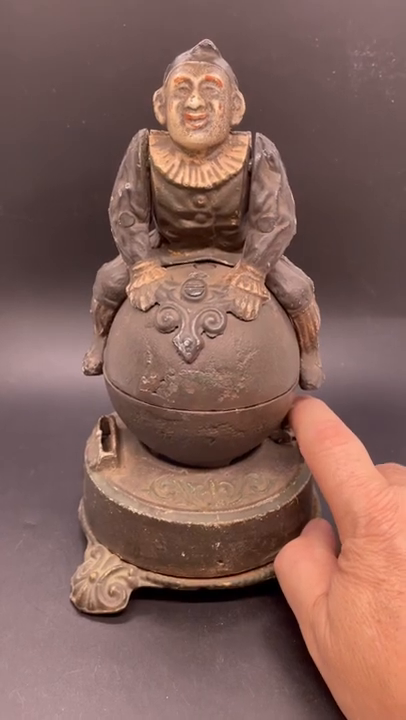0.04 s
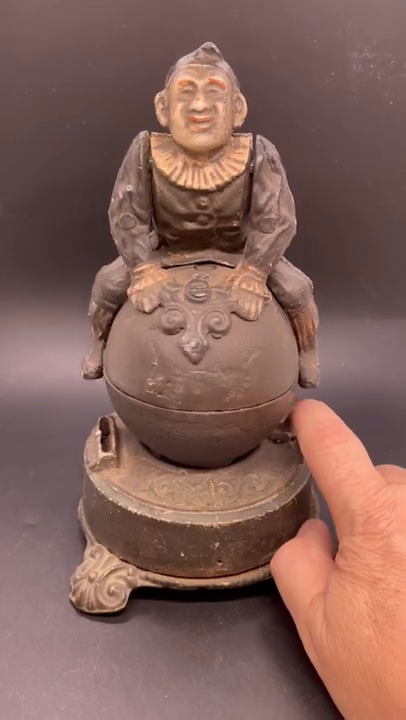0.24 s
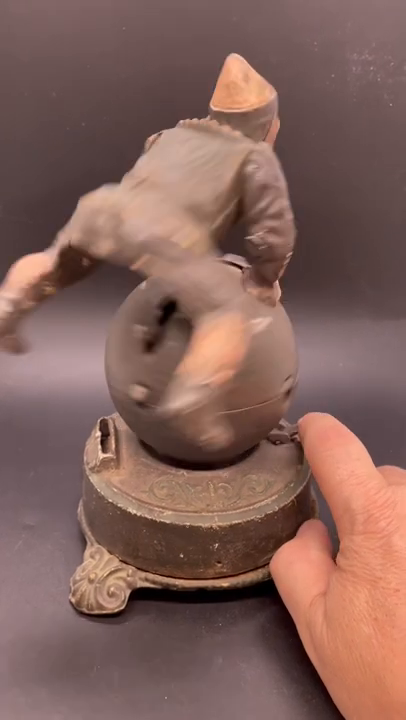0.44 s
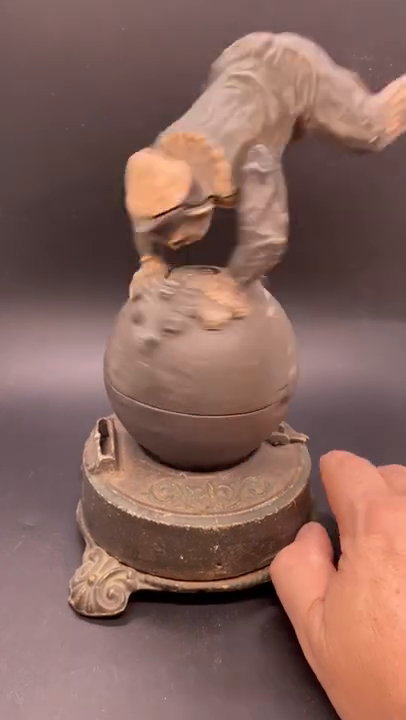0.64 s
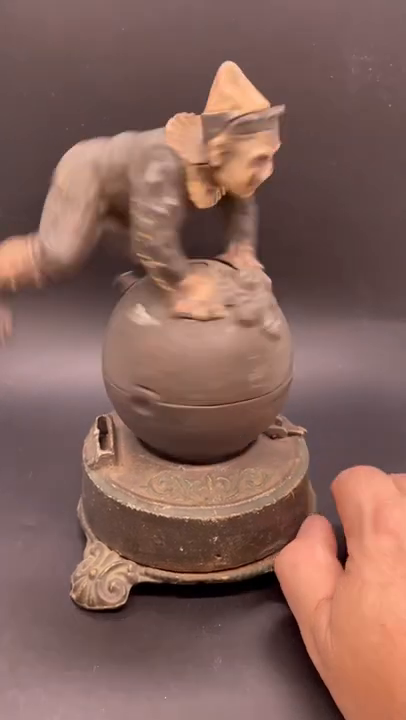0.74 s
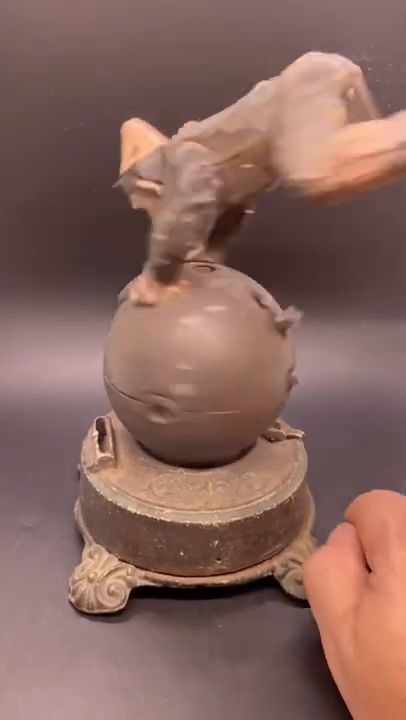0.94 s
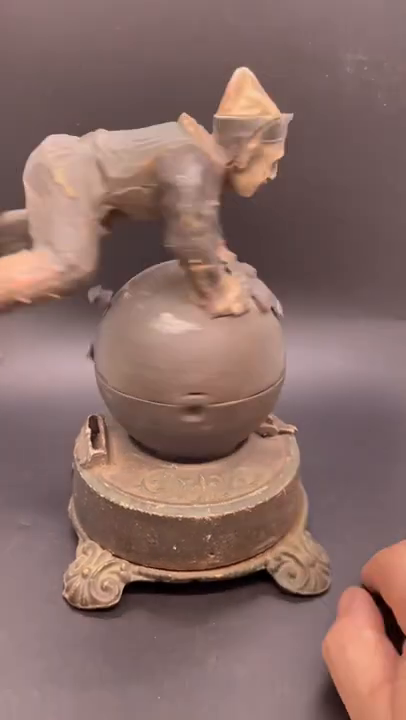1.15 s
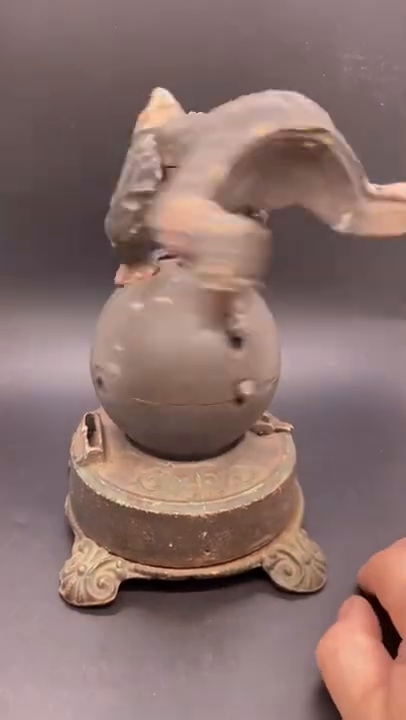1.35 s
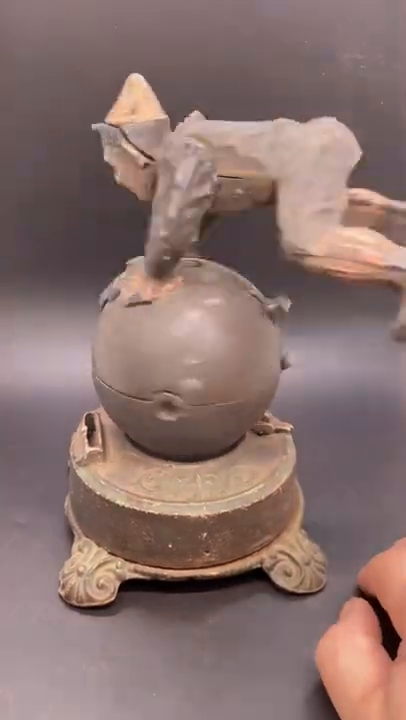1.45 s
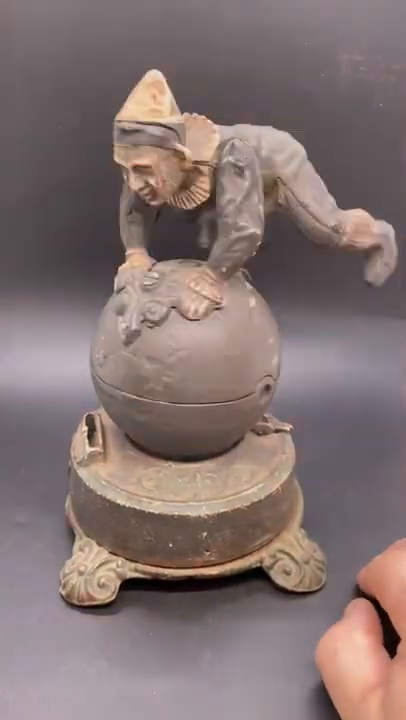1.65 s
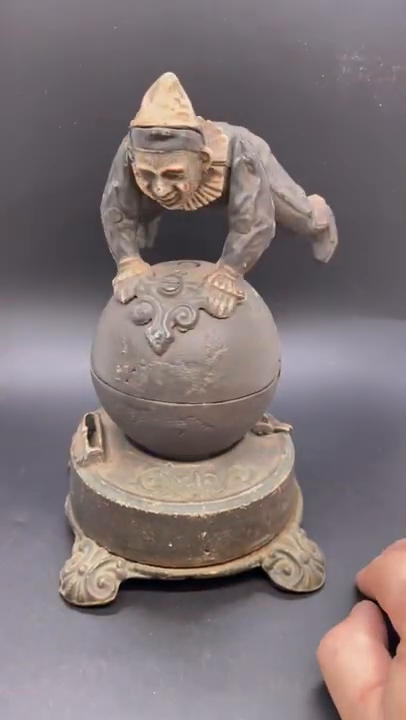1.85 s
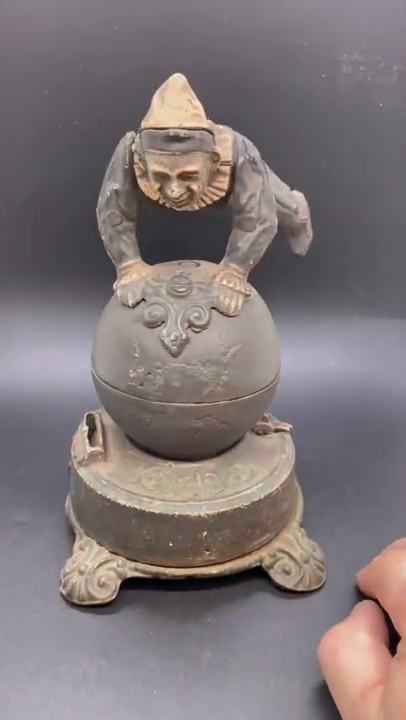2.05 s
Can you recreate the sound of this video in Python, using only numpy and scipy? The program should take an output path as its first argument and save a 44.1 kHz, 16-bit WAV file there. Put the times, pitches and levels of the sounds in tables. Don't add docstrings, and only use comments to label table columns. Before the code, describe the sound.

A cast-iron mechanical bank, heard close in a small, fairly dry room with a low wavering hum. Faint lever ticks before 0.2 s, then knocks and rough grinding burst out, with a bright hard clack at 0.4 s. Uneven metallic rattling, table thumps and thin squeals continue from 0.55 to 1.2 s, thinning to separate knocks by 1.5 s, soft rocking until 1.8 s, and a faint last tick near 2.1 s.

```python
import sys
import numpy as np
from scipy import signal
from scipy.fft import rfft, irfft, next_fast_len
from scipy.io import wavfile
from scipy.ndimage import uniform_filter1d, map_coordinates

SR = 44100
rng = np.random.default_rng(int(sys.argv[2]) if len(sys.argv) > 2 else 0)


def wrap_up_sound(samples):
    columns = np.atleast_2d(samples).T
    tamed = np.clip(columns, -1, 1)
    steps = np.round(tamed * 32767).astype(np.int16)
    wavfile.write(sys.argv[1], SR, steps)


def voltage_ratio(decibels):
    exponent = np.asarray(decibels, float) / 20
    return 10 ** exponent


N = 92610

# start_s, peak_db, table thump over it_db, brightness over it_db, ring_hz
KNOCKS = [(0.176, -24, -23, -19, 900), (0.229, -22, -7.5, -52, 840), (0.261, -15.5, -26, -61, 810),
          (0.314, -6.5, -29, -48, 683), (0.364, -14, -6, -42, 694), (0.489, -32, 1, -10, 690),
          (0.62, -12.5, -43, -21, 2453), (0.664, -18.5, -39, -30, 797), (0.699, -10.5, -18, -38, 896),
          (0.725, -27, -4, -28, 770), (0.869, -13, -11, -24, 752), (0.883, -14, -22, -17, 870),
          (0.93, -14.5, -17.5, -21, 747), (1.026, -10, -21, -25, 757), (1.049, -18, -9, -18, 706),
          (1.098, -15, -4, -23, 1058), (1.253, -16.5, -21, -28.5, 727), (1.311, -7, -16, -32, 818),
          (1.369, -23.5, -9, -40, 1095), (1.422, -25, -9, -42, 1097), (1.471, -18.5, -13, -53, 700),
          (1.582, -23, -4.5, -37, 730), (1.681, -33.5, 1.5, -17, 740), (1.702, -41, 9, -18, 680)]
KNOCK_S, KNOCK_DB, THUMP_DB, BRIGHT_DB, KNOCK_HZ = np.transpose(KNOCKS)
SHEEN_DB = -19


def mechanism():
    # time_s, grinding_db, table load over it_db
    spin = [(0.16, -58, 23), (0.176, -24.5, -17), (0.218, -46.5, 19), (0.277, -24, 9.5), (0.368, -20, -1),
            (0.389, -26, 14), (0.408, -40.5, -1), (0.44, -37, 5), (0.733, -26, 4), (0.763, -33, 9),
            (0.945, -24.5, 5), (1.217, -36.5, 9.5), (1.324, -30.5, -2.5), (1.398, -46, 14),
            (1.482, -43, 16.5), (1.505, -46.5, 16.5), (1.718, -52.5, -7), (1.85, -70.5, 13)]
    # start_s, peak_db
    ticks = [
        (0.092, -59.5),
        (0.163, -51),
        (2.097, -40),
    ]
    time_s, grind_db, load_db = np.transpose(spin)
    t = np.arange(N) / SR
    grind_db = np.interp(t, time_s, grind_db, -120, -120)
    load_db = np.interp(t, time_s, load_db)
    clumps = voltage_ratio(grind_db + 2.84 * wobble(70) - 6.0) * rattle()
    knocks = bursts(KNOCK_S, KNOCK_DB - 7.5, rise_s=0.0014, t60_s=0.03)
    shell = clumps + knocks + bursts(*np.transpose(ticks), rise_s=0.001, t60_s=0.036)
    sheen, snaps = bright_edge(clumps, shell)
    fine = voltage_ratio(-4.5) * chatter(uniform_filter1d(shell, size=700))
    return iron_shell(shell) + sheen + fine + struck_parts() + table(grind_db + load_db) + rocking(), snaps


def grit():
    contacts_per_s, spread_db = 5000, 3.5
    hit = rng.random(N) < contacts_per_s / SR
    size = voltage_ratio(spread_db * rng.exponential(size=N)).clip(0, 8)
    return unit(hit * rng.standard_normal(N) * size)


def rattle():
    taps_per_s, level_db, t60_s = 480, -7, 0.021
    taps = (rng.random(N) < taps_per_s / SR) * rng.uniform(0.19, 1, N)
    decay = voltage_ratio(-60 * np.arange(SR // 10) / SR / t60_s)
    return 1 + voltage_ratio(level_db) * signal.fftconvolve(taps, decay)[:N]


def iron_shell(envelope):
    # centre_hz, width_hz, level_db
    iron = [(593.7, 48, -7), (710, 50, 3.5), (830, 130, -0.5), (1099, 16, -4.5), (1255, 250, -9),
            (1677, 84, -19), (1637, 29, -7), (2118, 90, -5), (2536, 76, -6.5), (3212, 130, -15),
            (4000, 310, -17.5), (5300, 200, -16), (5210, 470, -16), (7700, 450, -23.5)]
    force = grit()
    total = np.zeros(N)
    for k, mode in enumerate(iron):
        mixed = force + np.roll(force, k * SR // 10)
        coupling = voltage_ratio(2 * wobble(24.3) - 3)
        total += (-1) ** k * body(mixed * envelope * coupling, [mode])
    return total / np.std(body(force, iron))


def bright_edge(clumps, shell):
    # freq_hz, level_db
    spectrum = [(3000, -65.5), (6000, 4.5), (8400, 3.5), (10200, -6), (12500, -12), (15500, -9.5),
                (16500, -17)]
    # centre_hz, width_hz, level_db
    edge_modes = [(7160, 120, 10), (8020, 100, 4.5), (9300, 110, -4), (10500, 120, -3.5), (13400, 200, -5),
                  (14000, 200, -12.5)]
    # start_s, peak_db
    spikes = [(.094, -62), (0.159, -55), (0.317, -18), (.358, -44), (0.491, -41), (0.748, -30.5),
              (1.255, -38), (1.3126, -23.5), (1.371, -39), (1.423, -45.5), (1.472, -40)]
    bright = unit(filtered(grit(), lambda hz: voltage_ratio(along(spectrum, hz))))
    snaps = bright * bursts(*np.transpose(spikes), rise_s=0.00017, t60_s=0.04)
    grinding = voltage_ratio(SHEEN_DB) * uniform_filter1d(clumps, size=900)
    knocks = bursts(KNOCK_S, KNOCK_DB + BRIGHT_DB - 2.5, rise_s=0.00028, t60_s=0.12)
    edge_force = voltage_ratio(SHEEN_DB) * uniform_filter1d(shell, size=900)
    ringing = voltage_ratio(3.5) * driven(grit(), edge_force, edge_modes)
    return bright * (grinding + knocks) + ringing, snaps


def chatter(envelope):
    fine_hz = [528, 684, 870, 1116, 1251, 1354, 1638, 1835, 1982, 2300, 2545, 3255, 4978, 5430]
    taps_per_s, detune, width_hz, tilt_db_per_octave = 90, 0.012, 20, -3
    modes = []
    for hz in fine_hz:
        ratio = hz / fine_hz[0]
        for k in (-1, 1):
            modes.append((hz * (1 + detune * k), width_hz * np.sqrt(ratio), tilt_db_per_octave * np.log2(ratio)))
    shape = (len(modes), N)
    taps = (rng.random(shape) < taps_per_s / SR) * rng.standard_normal(shape)
    ringing = [body(np.array([tap, tap * envelope]), [mode]) for tap, mode in zip(taps, modes)]
    steady, shaped = np.sum(ringing, axis=0)
    return shaped / steady.std()


def struck_parts():
    # start_s, peak_db, ring_hz
    settles = [
        (1.549, -34.5, 830),
        (1.64, -38, 800),
        (1.703, -28.5, 714),
        (1.769, -42.5, 654),
        (1.795, -47, 760),
        (2.001, -50, 830),
    ]
    # start_s, peak_db, ring_hz
    pings = [(.332, -30, 4870), (0.384, -33, 5500), (.5226, -32, 1270), (.558, -37, 2530),
             (0.6193, -25, 1296), (.638, -30.5, 4000), (0.647, -28, 5470), (0.6653, -24.5, 1990),
             (0.677, -27, 5530), (.685, -22.5, 4860), (.7, -15, 1073), (0.703, -25.5, 3020),
             (0.709, -27, 2502), (0.722, -25, 5940), (0.722, -25, 3280), (.735, -26.5, 2098),
             (0.776, -29, 2610), (.8554, -31, 2620), (0.8856, -27.5, 2590), (0.9294, -28, 1110),
             (0.96, -37, 2550), (1.028, -25, 1303), (1.0464, -23, 2180), (1.058, -26, 3815),
             (1.083, -23, 2110), (1.095, -38, 5300), (1.1033, -22, 2035), (1.107, -26, 3280),
             (1.2366, -38, 1620), (1.2584, -24.5, 2540), (1.289, -25.5, 1800), (1.292, -38, 5300),
             (1.3096, -18.5, 1250), (1.313, -19, 2574), (1.323, -26, 5300), (1.424, -44, 5400),
             (1.477, -30, 1082), (1.478, -34.5, 3294), (1.584, -44.5, 2100), (1.681, -45, 3240),
             (1.701, -47.5, 2050)]
    knocks = rings(KNOCK_S, KNOCK_DB - 9, KNOCK_HZ, t60_s=0.073)
    return knocks + rings(*np.transpose(settles), t60_s=0.064) + rings(*np.transpose(pings), t60_s=0.054)


def table(load_db):
    # centre_hz, width_hz, level_db
    table_modes = [(100, 72.3, 2.5), (163, 45, -12.5), (229, 21.5, -11), (316, 91.3, -4)]
    thump_db = KNOCK_DB + THUMP_DB
    load = voltage_ratio(load_db + 3 * wobble(21) + 1.8 * wobble(9.34) - 3.5)
    load = load + bursts(KNOCK_S, thump_db, rise_s=0.0014, t60_s=0.11)
    push_hz = 110.7 * (1 + 0.096 * rng.standard_normal(len(KNOCK_S)))
    pushed = rings(KNOCK_S, thump_db + 8.5, push_hz, t60_s=0.14)
    return pushed + driven(rng.standard_normal(N), load, table_modes)


def rocking():
    # start_s, length_s, peak_db, pitch_hz
    sways = [(.278, 0.02, -8.5, 111.8), (0.32, 0.05, -14, 108.2), (0.494, 0.048, -28, 102),
             (0.583, 0.036, -16.5, 100), (0.636, 0.021, -14.5, 106), (.668, 0.03, -19, 100),
             (0.717, 0.024, -12, 109), (0.771, 0.017, -37, 110.4), (0.866, 0.036, -24.5, 95.3),
             (0.902, 0.12, -25, 109.5), (1.071, 0.02, -12, 100), (1.085, 0.059, -15, 109.8),
             (1.146, 0.05, -20.5, 111.6), (1.225, 0.027, -20.5, 129), (1.269, 0.043, -26.5, 108.5),
             (1.311, 0.048, -17.5, 107.8), (1.376, 0.052, -25, 100), (1.457, 0.082, -28, 103.4),
             (1.557, 0.11, -39.5, 113), (1.62, .06, -30, 100)]
    upper_ratio, upper_db = 2.6, -10
    turn = 2 * np.pi * np.arange(N) / SR
    total = np.zeros(N)
    for start_s, length_s, peak_db, hz in sways:
        tone = np.sin(hz * turn) + voltage_ratio(upper_db) * np.sin(upper_ratio * hz * turn)
        total += strokes([(start_s, length_s, peak_db)]) * tone
    return total


def clack():
    # centre_hz, width_hz, level_db
    stop_modes = [(760, 120, 7), (1335, 130, 0.5), (2100, 200, -3.5), (3620, 1700, -7.5), (5460, 1000, -3),
                  (7030, 210, 6), (7970, 400, 0), (10100, 1400, -6), (14200, 2000, -10)]
    # start_s, peak_db, ring_hz
    clack_body = [
        (.405, -19, 760),
        (.4075, -12, 1350),
        (.4055, -9.5, 4980),
        (.409, -23.5, 10300),
    ]
    hit_s, rebound_gap_s, peak_db = 0.403, 0.006, -10.5
    blows = bursts([hit_s, hit_s + rebound_gap_s], [peak_db, peak_db], rise_s=0.00048, t60_s=0.037)
    return driven(rng.standard_normal(N), blows, stop_modes) + rings(*np.transpose(clack_body), t60_s=0.022)


def rubbing():
    # start_s, length_s, level_db
    rubs = [
        (0.035, 0.11, -63.5),
        (1.65, 0.084, -56.5),
    ]
    # freq_hz, level_db
    rub_spectrum = [(500, -8.5), (2000, 1), (5000, -4.5), (9000, -20), (16500, -11)]
    # start_s, length_s, level_db
    squeals = [
        (.545, 0.07, -36),
        (.605, 0.022, -26),
        (.75, 0.1, -33),
        (.855, 0.026, -50),
        (.92, 0.076, -41.5),
        (1.11, 0.049, -36.5),
    ]
    squeal_hz, waver_rad = 2554, 0.95
    phase = 2 * np.pi * squeal_hz * np.arange(N) / SR + waver_rad * wobble(59.6)
    tone = np.sin(phase) * voltage_ratio(3.1 * wobble(100))
    rub = unit(filtered(grit(), lambda hz: voltage_ratio(along(rub_spectrum, hz))))
    return strokes(rubs) * rub + strokes(squeals) * tone


def ports(x):
    # freq_hz, phase_rad
    port_phase = [(0, 0), (200, -.15), (350, -.6), (950, -1), (1500, -.8), (2500, 1.2), (3100, -.8),
                  (4050, 1), (5200, 0), (7500, 3.14), (11000, 6.28), (14300, 9.42), (17000, 11.5)]
    # freq_hz, level_db
    port_pan = [(60, -1.1), (380, 3), (700, 1), (1400, -4), (2600, 3.5), (5000, 0.5)]
    f, turn = np.transpose(port_phase)
    side = np.array([[.5], [-.5]])
    return filtered(x, lambda hz: voltage_ratio(side * along(port_pan, hz)) * np.exp(1j * side * np.interp(hz, f, turn)))


def room(x):
    # freq_hz, t60_s
    decay_times = [(100, .15), (700, 0.32), (3000, 0.09), (10000, 0.069)]
    # freq_hz, level_db
    wet_spectrum = [(100, -32), (300, -8.5), (1000, -15.5), (3000, -6), (8000, -4)]
    hz, t, z = signal.stft(rng.standard_normal((2, SR // 2)), SR, nperseg=256)
    decay = voltage_ratio(-60 * t / along(decay_times, hz)[:, None])
    tail = signal.istft(z * decay, SR, nperseg=256)[1]
    tail = tail / np.linalg.norm(tail, axis=1, keepdims=True)
    wet = signal.fftconvolve(x[None], tail, axes=1)[:, :N]
    return filtered(wet, lambda hz: voltage_ratio(along(wet_spectrum, hz)))


def background():
    # freq_hz, density_db_per_hz
    air_spectrum = [(25, -3.5), (130, -9.5), (200, -14.5), (500, -32), (1000, -38), (2650, -48),
                    (2850, -56.5), (15000, -72)]
    # freq_hz, correlation
    air_alike = [(60, 0.94), (290, .87), (640, 0.32), (1400, .1), (15000, .3)]
    hum_hz, hum_db, drift_rad, air_db = 116.54, -34, 0.42, -42
    phase = 2 * np.pi * hum_hz * np.arange(N) / SR + drift_rad * wobble(22)
    hum = np.sin(phase) * voltage_ratio(hum_db + wobble(23))

    def mid_side(hz):
        turn = np.arccos(np.clip(along(air_alike, hz), -1, 1)) / 2
        return voltage_ratio(along(air_spectrum, hz)) * [np.cos(turn), np.sin(turn)]

    mid, side = filtered(rng.standard_normal((2, N)), mid_side)
    return hum + voltage_ratio(air_db) * unit(np.array([mid + side, mid - side]))


def with_gaps(pair):
    # low_hz, high_hz
    sum_gaps = [(6800, 8200), (13000, 23000)]
    # low_hz, high_hz
    difference_gaps = [(9900, 12200), (15900, 23000)]
    gap_db, edge_hz, strip_hz, strip_half_width_hz = -42, 60, 15680, 200

    def step(hz):
        return (1 + np.tanh(hz / edge_hz)) / 2

    def gap(bands, hz):
        return voltage_ratio(gap_db * sum(step(hz - lo) * step(hi - hz) for lo, hi in bands))

    halves = np.array([pair[0] + pair[1], pair[0] - pair[1]]) / 2
    mid, side = filtered(halves, lambda hz: np.array([gap(sum_gaps, hz), gap(difference_gaps, hz)]))
    gated = pair.sum(0) * (wobble(14) > 0)
    mid = mid + filtered(gated, lambda hz: step(strip_half_width_hz - abs(hz - strip_hz)))
    return np.array([mid + side, mid - side])


def body(x, modes):
    def response(f):
        return sum((-1) ** k * voltage_ratio(db) * 1j * f * w / (c * c - f * f + 1j * f * w)
                   for k, (c, w, db) in enumerate(modes))
    return filtered(x, response)


def driven(force, envelope, modes):
    return body(force * envelope, modes) / np.std(body(force, modes))


def bursts(times, levels_db, rise_s, t60_s):
    t = (np.arange(N) / SR - np.array(times)[:, None]).clip(0)
    decay = voltage_ratio(np.array(levels_db)[:, None] - 60 * t / t60_s)
    return (decay * (1 - np.exp(-t / rise_s))).sum(0)


def rings(times, levels_db, pitches_hz, t60_s):
    t = (np.arange(N) / SR - times[:, None]).clip(0)
    envelope = voltage_ratio(levels_db[:, None] - 60 * t / t60_s) * (1 - np.exp(-t / .0004))
    return (envelope * np.sin(2 * np.pi * pitches_hz[:, None] * t)).sum(0)


def strokes(rows):
    t = np.arange(N) / SR
    return sum(voltage_ratio(db) * np.sin(np.pi * ((t - s) / length).clip(0, 1)) for s, length, db in rows)


def wobble(rate):
    return map_coordinates(rng.standard_normal(1000), [np.arange(N) * min(rate, 400) / SR])


def filtered(x, response):
    m = next_fast_len(N + SR // 2)
    return irfft(rfft(x, m) * response(np.fft.rfftfreq(m, 1 / SR)), m)[..., :N]


def along(points, hz):
    f, v = np.transpose(points)
    return np.interp(np.log(hz + 1), np.log(f + 1), v)


def unit(x):
    return x / np.sqrt(np.mean(x ** 2) + 1e-20)


def scene():
    spin, snaps = mechanism()
    spin = spin + rubbing()
    sharp = snaps + clack()
    return with_gaps(ports(spin) + room(spin + sharp) + background()) + ports(sharp)


def low_pass(x):
    return signal.sosfilt(signal.butter(12, 16460, fs=SR, output="sos"), x)


def record(dry):
    low_cut_hz, limit, top_hz = 36.6, 0.85, 16400
    heard = filtered(dry, lambda hz: (1j * hz / (low_cut_hz + 1j * hz)) ** 4)
    heard = heard / (1 + np.abs(heard / limit) ** 4) ** .25
    mix = filtered(heard, lambda hz: (1 - np.tanh((hz - top_hz) / 80)) / 2)
    return low_pass(mix)


dry = scene()
out = record(dry)
wrap_up_sound(out)
```